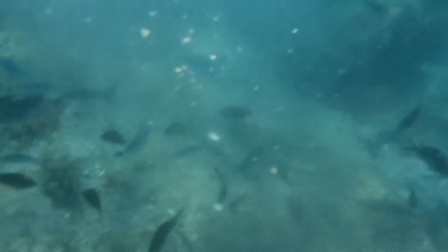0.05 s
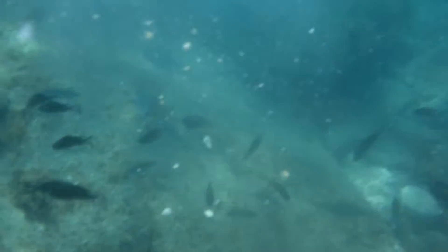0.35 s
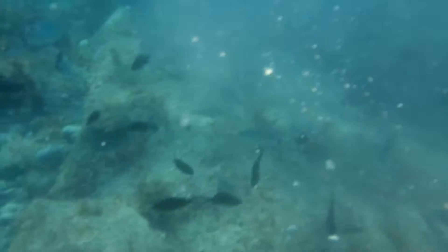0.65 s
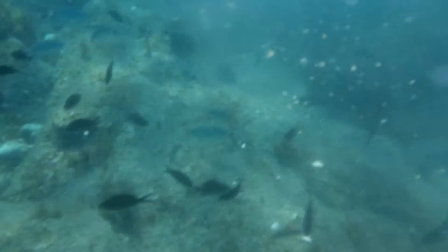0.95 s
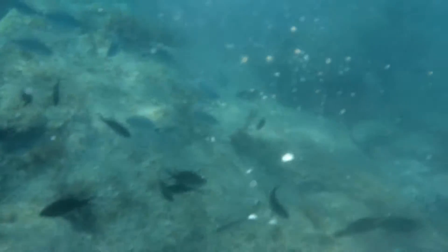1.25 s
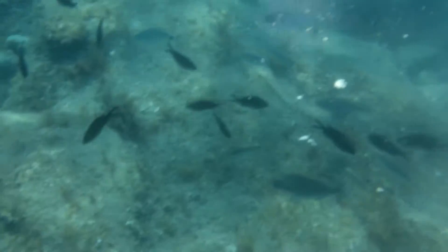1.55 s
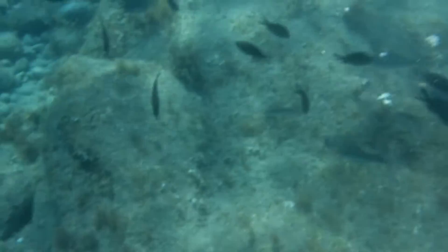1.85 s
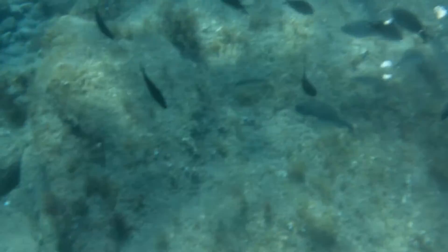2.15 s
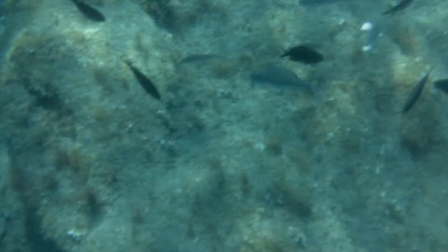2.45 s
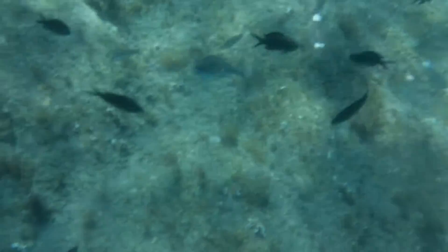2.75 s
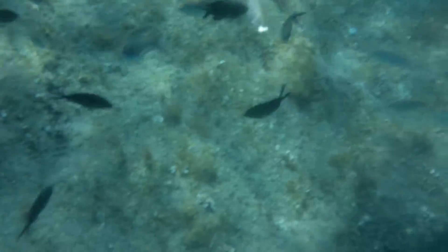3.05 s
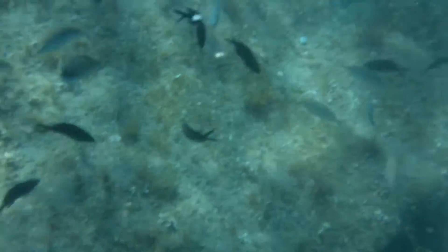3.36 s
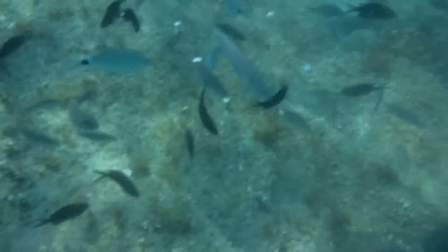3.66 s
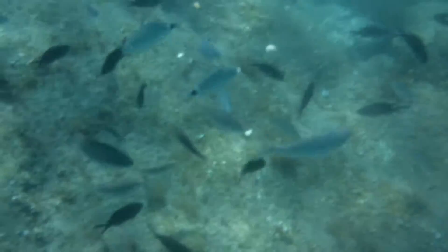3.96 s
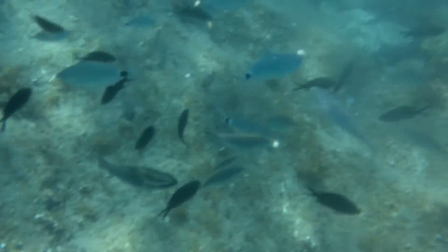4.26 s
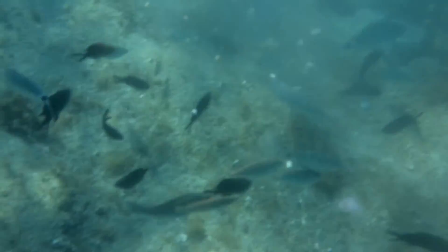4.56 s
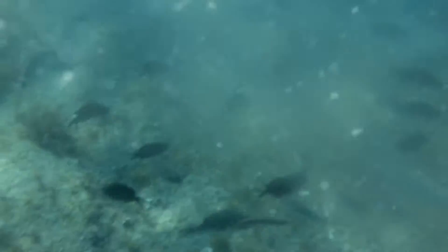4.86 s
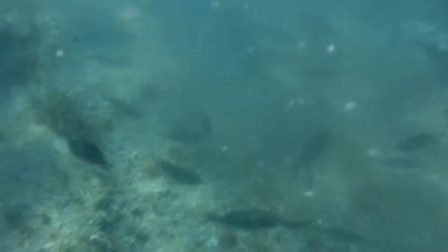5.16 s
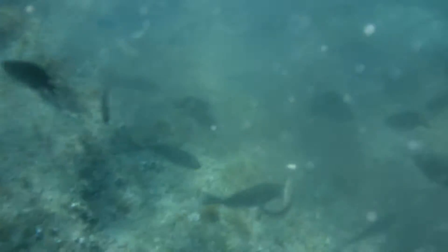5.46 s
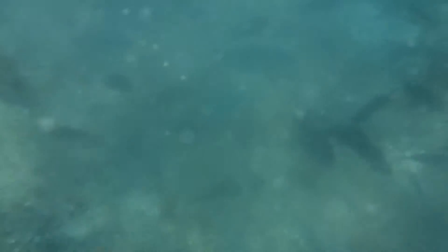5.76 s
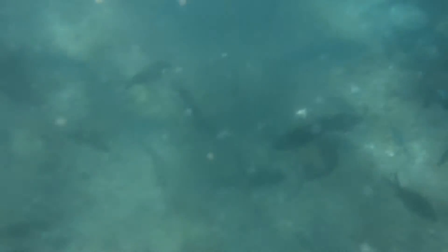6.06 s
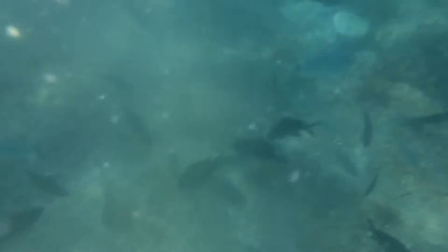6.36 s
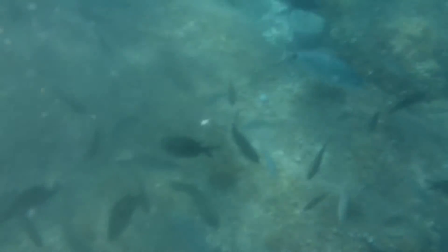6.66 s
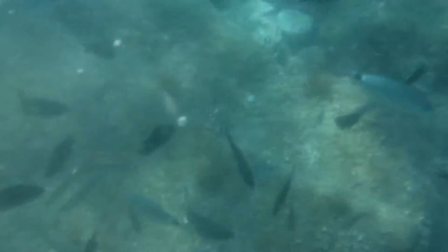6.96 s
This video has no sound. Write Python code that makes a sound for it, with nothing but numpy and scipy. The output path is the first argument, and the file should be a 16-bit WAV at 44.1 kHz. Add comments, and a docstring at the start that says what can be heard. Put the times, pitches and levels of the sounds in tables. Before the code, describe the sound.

Heard from inside a watertight case above a rocky seabed, eddies thud and rumble unevenly against the microphone. An early low burble of air gives way to scattered plinks, a rounder bloop about halfway and light fizzing swells of tiny bubbles. The case clicks now and then, with a sharp crack and a duller knock late on. The water sounds muffled, over a faint hiss.

```python
"""Low thumps and churning: eddies hit a watertight camera case adrift just below the surface.
Over a rocky seabed, bubbles ring as they close, swarms of tiny ones gurgle, one air cloud boils up.
Sharp ticks and knocks ring the case resonances over a faint steady hiss.
The water muffles everything."""
import sys
import numpy as np
from scipy import signal
from scipy.fft import rfft, irfft
from scipy.io import wavfile
from scipy.ndimage import uniform_filter1d

SR = 44100
rng = np.random.default_rng(int(sys.argv[2]) if len(sys.argv) > 2 else 0)


def dump_mix(stems):
    """Bounce the given channels to the path in sys.argv[1] as a 16-bit WAV at rate SR."""
    frames = np.atleast_2d(stems).T  # one column per channel
    limited = np.clip(frames, -1, 1)  # hard clip at full scale
    pcm = np.round(limited * 32767).astype(np.int16)
    wavfile.write(sys.argv[1], SR, pcm)


N = 318402

# strong eddies: crest t/s, level/dB, f/Hz, half length/s
STRONG_EDDIES = [(.022, -23, 136, 0.018), (0.074, -15, 120.4, .006), (.123, -8.5, 103.7, .004),
                 (0.198, -3, 88.5, .0034), (0.208, -13, 72, 0.033), (.286, -20, 97.7, .004),
                 (0.423, -14.5, 164.7, 0.0043), (0.609, -18.5, 105, 0.0014), (0.784, -11.5, 95, 0.0055),
                 (.848, -17, 98.4, 0.012), (0.95, -10.5, 90.5, 0.0047), (.975, -13.5, 118, .002),
                 (1.182, -15.5, 94, .0055), (1.298, -12.5, 125.6, .005), (1.332, -15, 122, .004),
                 (1.478, -21, 149, 0.0066), (1.584, -11, 122.6, .0015), (1.685, -22.5, 139, 0.017),
                 (1.773, -15.5, 111.5, .005), (1.811, -19, 102.4, .0045), (1.964, -12.5, 105.8, 0.01),
                 (2.019, -13, 95, .003), (2.124, -10, 126.5, 0.0055), (2.19, -20.5, 113.5, 0.037),
                 (2.226, -18.5, 118.4, 0.0015), (2.3, -18.5, 149, .008), (2.549, -20.5, 177, 0.0015),
                 (2.579, -17, 125.5, 0.0092), (2.798, -14, 81, 0.003), (2.826, -12, 100.7, .0056),
                 (3.001, -17, 89.4, 0.0027), (3.029, -23, 102.5, .018), (3.063, -18, 92.2, 0.0028),
                 (3.172, -22.5, 101.7, 0.0097), (3.284, -13.5, 139, .005), (3.343, -14.5, 139.4, .011),
                 (3.392, -18, 112.3, 0.0072), (3.42, -13, 114, 0.011), (3.449, -22.5, 132, 0.0049),
                 (3.532, -11.5, 111, 0.0016), (3.553, -10, 126.2, .008), (3.691, -7, 119.3, 0.0034),
                 (3.716, -18, 119, .009), (3.79, -16.5, 123, 0.0027), (3.946, -15.5, 141.5, 0.005),
                 (3.971, -24, 131, 0.014), (4.202, -14, 140, .005), (4.341, -22, 106, 0.012),
                 (4.4, -12, 127.4, 0.0044), (4.466, -24.5, 111, 0.0058), (4.61, -21, 105, 0.0053),
                 (4.633, -19, 98, 0.014), (5.016, -25.5, 121, 0.018), (5.302, -12.5, 95.4, 0.0047),
                 (5.379, -16, 114.6, 0.0045), (5.516, -24.5, 116.6, .004), (5.581, -19.5, 96, .0017),
                 (6.021, -19, 82, 0.0034), (6.167, -22.5, 106.5, 0.0089), (6.362, -25, 107.5, 0.0075),
                 (6.408, -22, 143, 0.0065), (6.427, -20, 106.4, 0.0044), (6.5, -16, 139, 0.011),
                 (6.611, -11, 142.6, 0.0037), (6.817, -16.5, 118, 0.014), (6.923, -13, 93, 0.0039)]
# flow past the case: t/s, level/dB
FLOW_LEVEL = [(0, -34), (.5, -40), (.8, -34), (1.05, -41.5), (1.38, -33.5), (2.05, -35.5), (2.65, -43.5),
              (3.15, -43), (3.4, -38), (4.1, -43), (4.43, -36.5), (4.74, -49.5), (5.45, -40), (6.4, -43.5),
              (6.73, -48.5), (7.22, -46)]
# rumble of small eddies: f/Hz, level/dB
CHURN_SPECTRUM = [(15, -22.5), (28, -8), (48, 12), (75, 5), (120, 9.5), (165, 1.5), (215, -12.5),
                  (280, -25.5), (400, -33.5), (700, -68)]
# fast water on the case: f/Hz, level/dB
SLOSH_SPECTRUM = [(120, -10.5), (260, 12), (380, 2.5), (550, -4.5), (1000, -17.5), (2000, -24.5),
                  (6000, -60)]
# clear single bubbles: t/s, f/Hz, level/dB, t60/s
SINGLE_BUBBLES = [(.008, 924, -34.5, 0.045), (.227, 1170, -34, 0.032), (.549, 1070, -45, 0.092),
                  (.732, 851, -38.5, 0.13), (.734, 1586, -38, 0.049), (.753, 1057, -39.5, 0.049),
                  (.884, 976, -39, 0.055), (.944, 844, -34.5, 0.043), (1.803, 790, -39, 0.065),
                  (2.018, 307, -25, 0.046), (2.032, 1110, -37, 0.025), (2.149, 1810, -49, 0.064),
                  (2.186, 1470, -45, .04), (2.218, 1636, -47, 0.042), (2.224, 1284, -34, .032),
                  (2.776, 407, -39, 0.074), (3.012, 894, -43, 0.052), (3.076, 945, -39, 0.031),
                  (3.078, 388, -30.5, 0.032), (3.086, 595, -41.5, 0.15), (3.125, 1600, -51, 0.1),
                  (3.28, 267, -27.5, 0.057), (3.392, 2220, -41.5, 0.054), (3.4, 1690, -44, 0.089),
                  (3.415, 1286, -33.5, 0.057), (3.4355, 1122, -29.5, 0.069), (3.437, 1322, -36, .11),
                  (3.545, 575, -31.5, 0.058), (3.549, 1288, -32.5, 0.093), (3.689, 329.7, -18, .13),
                  (4.201, 236, -24, 0.025), (4.33, 980, -41.5, 0.053), (4.353, 1860, -44.5, 0.039),
                  (4.394, 970, -20.5, 0.0077), (4.412, 1620, -35, .042), (4.417, 1362, -30.5, 0.049),
                  (4.98, 1180, -36.5, 0.017), (5.261, 1620, -39.5, 0.034), (5.299, 935, -37.5, 0.053),
                  (5.595, 970, -21, 0.0069), (5.771, 236, -19, 0.041), (5.795, 1500, -46, 0.047),
                  (6.233, 1193, -53, 0.13)]
# two large bubbles pinching off, one track each: t/s, f/Hz, level/dB
WARBLE_TRACKS = [
    [(1.579, 740, -95), (1.582, 680, -28), (1.592, 788, -28.5), (1.603, 930, -30), (1.611, 730, -34),
     (1.622, 1035, -38.5), (1.626, 813, -32), (1.65, 824, -47.5), (1.71, 814, -77)],
    [(2.546, 845, -65), (2.551, 857, -35), (2.572, 1063, -43.5), (2.586, 1460, -55), (2.6, 2100, -74)],
]
# trickle of air: t/s, level/dB
TRICKLE_LEVEL = [(0, -62.5), (1.5, -64), (2.4, -68.5), (4.2, -74.5), (4.9, -68), (5.7, -63.5), (6.1, -70.5),
                 (7.22, -74.5)]
# puffs of air stirred into the water: crest t/s, level/dB, decay constant/s
AIR_PUFFS = [(.01, -54.5, 0.23), (.24, -55.5, 0.033), (.56, -52.5, .17), (1.24, -58, 0.3),
             (2.03, -54, 0.13), (2.8, -58.5, 0.077), (3.05, -53, 0.24), (3.43, -52, 0.34), (3.77, -54, .05),
             (4.42, -51.5, 0.21), (5.23, -65, 0.21), (5.59, -64, 0.24)]
# bubbles too small to tell apart: f/Hz, level/dB
WASH_SPECTRUM = [(250, 2.5), (550, -9.5), (850, -1), (1150, 1), (1500, -6.5), (1900, -11.5), (2400, -24),
                 (3200, -16.5), (4500, -23.5), (9000, -31.5)]
# air cloud boiling up: t/s, level/dB
CLOUD_LEVEL = [(.62, -60), (.69, -34.5), (.76, -31.5), (.84, -31.5), (.93, -36), (1.02, -40.5), (1.12, -51),
               (1.2, -81)]
# collective cloud modes: f/Hz, width per filter stage/Hz, level/dB
CLOUD_RESONANCES = [(223, 39, 7.5), (320, 39, 9), (389.6, 32.5, 10.5), (880, 82, -19.5), (1140, 86, -13.5)]
# hits on the case: t/s, ring level/dB, ring low f/Hz, ring high f/Hz, snap level/dB, snap high f/Hz
CASE_HITS = [(0.023, -47, 1800, 3860, -57, 12000), (.047, -42, 1320, 2650, -60, 7000),
             (0.064, -50.5, 1200, 3500, -59, 7000), (.199, -28, 297, 950, -57.5, 14000),
             (0.286, -52.5, 1000, 5000, -54, 6200), (0.303, -61, 4000, 7000, -57, 12000),
             (.809, -30.5, 1230, 3200, -34.5, 7700), (0.844, -39.5, 1100, 3880, -55, 5600),
             (.956, -41.5, 2700, 3370, -51.5, 13000), (1.81, -36, 2710, 3150, -48.5, 14000),
             (2.11, -52.5, 2600, 4000, -64, 12000), (2.1707, -44.5, 3010, 3400, -56, 14000),
             (2.196, -55.5, 5500, 7050, -64, 7200), (2.251, -53, 1000, 4000, -57, 14000),
             (2.566, -48, 2500, 3700, -58, 12000), (2.726, -44, 1780, 3940, -53.5, 12000),
             (2.817, -41.5, 710, 1610, -77, 7000), (2.986, -45.5, 900, 3520, -64, 7000),
             (3.3917, -47.5, 1400, 3600, -63.5, 7000), (3.547, -41, 287, 924, -76, 7000),
             (3.7838, -35, 740, 1450, -75, 7000), (4.281, -37.5, 584, 2280, -52, 7000),
             (4.426, -60, 2500, 5000, -53.5, 7000), (4.731, -36, 940, 2150, -53, 12000),
             (4.966, -49, 1480, 4030, -58, 7000), (5.554, -42, 940, 3500, -55, 8000),
             (5.7072, -21, 920, 3350, -33.5, 10600), (6.125, -51, 2000, 5000, -55, 9000),
             (6.279, -47.5, 295, 1320, -63, 7000), (6.6062, -24, 200, 880, -47.5, 6200),
             (6.721, -39, 910, 4160, -42, 7000)]
# case resonances: f/Hz, width/Hz, level/dB
CASE_MODES = [(405, 180, 1.5), (715, 1500, 3), (1045, 80, 11.5), (1720, 1300, -3.5), (2100, 750, -16.5),
              (2936, 390, 6), (4340, 450, 3.5), (4630, 1200, -16), (7000, 180, 4.5), (12900, 5100, -3)]
# hiss colour: f/Hz, level/dB
HISS_SPECTRUM = [(300, 0), (600, -14), (1100, 3), (1600, -20.5), (2200, -5.5), (3000, -2), (3600, -12),
                 (4400, -8), (5600, -14.5), (7100, -7.5), (8500, -19.5), (15000, -17)]
# hiss, with an early dip: t/s, level/dB
HISS_ENVELOPE = [(0, -69), (.3, -72.5), (.5, -71), (.7, -67.5), (2.3, -69), (4.3, -67.5), (7.22, -67.5)]


def eddy(db, hz, half_s, rise=1.83, fall=1.376, sag=.21):
    """Pressure pulse cresting mid-buffer: swells, fades, sags in pitch as the eddy spreads."""
    t = np.arange(-SR // 10, SR // 10) / SR
    age = np.clip(t / half_s, -50, 50)
    swell = 2 / (np.exp(-rise * age) + np.exp(fall * age))
    turns = np.cumsum(hz * (1 - sag * np.tanh(age))) / SR
    return -undb(db) * swell * np.sin(2 * np.pi * (turns - turns[len(t) // 2]))


def thumps():
    """Strong eddies hit the case one by one."""
    out = np.zeros(N)
    for crest_s, db, hz, half_s in STRONG_EDDIES:
        wave = eddy(db, hz, half_s)
        add(out, crest_s - len(wave) / SR / 2, wave)
    return out


def weak_eddies(count=56, over_flow_db=13, spread_db=3, centre_hz=122, spread_oct=.25, half_s=.0034):
    """Loose procession of eddies, scaled by the flow that sheds them."""
    out = np.zeros(N)
    for k, (lag, strength, pitch, length) in enumerate(rng.uniform(-1, 1, (count, 4))):
        hz = centre_hz * 2 ** (spread_oct * pitch)
        wave = eddy(over_flow_db + spread_db * strength, hz, half_s * np.exp(length))
        crest_s = (k + .5 + lag / 2) * N / SR / count
        add(out, crest_s - len(wave) / SR / 2, wave)
    return out * curve(FLOW_LEVEL)


def churn(over_flow_db=7):
    """Many small eddies overlap into a lumpy rumble."""
    rumble = colour(impulses(per_s=240, spread_db=1.5), CHURN_SPECTRUM)
    return unit(rumble) * curve(FLOW_LEVEL) * undb(over_flow_db)


def slosh(pressure, gain_db=-30, exponent=1.51):
    """Water rushing over the case rustles with each pressure swing."""
    rustle = unit(colour(impulses(per_s=3000, spread_db=3.5), SLOSH_SPECTRUM))
    envelope = np.abs(signal.hilbert(pressure))
    peak = envelope.max()
    return rustle * peak * (envelope / peak) ** exponent * undb(gain_db)


def bubble(hz, t60_s, glide_oct_per_s, onset_cycles=.8, wobble_oct=.022):
    """A bubble rings on closing; pitch glides and wobbles as its shape changes."""
    t = np.arange(int(t60_s * SR) + 2) / SR
    shape = np.interp(t, np.linspace(0, .2, 40), rng.standard_normal(40))
    turns = np.cumsum(hz * 2 ** (glide_oct_per_s * t + wobble_oct * shape)) / SR
    onset = 1 - np.exp(-(turns / onset_cycles) ** 2)
    return np.sin(2 * np.pi * turns) * undb(-60 * t / t60_s) * onset


def clear_bubbles(shed_db=-14, shed_oct=.11, shed_s=.031):
    """Plinks and bloops; each bubble sheds four short-lived ones of similar size."""
    out = np.zeros(N)
    for start_s, hz, db, t60_s in SINGLE_BUBBLES:
        add(out, start_s, undb(db) * bubble(hz, t60_s, glide_oct_per_s=2))
        for lag, pitch in rng.random((4, 2)):
            shed_hz = hz * 2 ** (shed_oct * (2 * pitch - 1))
            add(out, start_s + shed_s * lag, undb(db + shed_db) * bubble(shed_hz, t60_s / 2, 0))
    return out


def warbles():
    """Large bubbles swing in pitch, squeezed as they pinch off."""
    out = np.zeros(N)
    for track in WARBLE_TRACKS:
        times_s, hz, db = np.transpose(track)
        t = np.arange(times_s[0], times_s[-1], 1 / SR)
        turns = np.cumsum(np.interp(t, times_s, hz)) / SR
        add(out, times_s[0], undb(np.interp(t, times_s, db)) * np.sin(2 * np.pi * turns))
    return out


def cloud():
    """Air breaking up drives the low, steep-sided modes of a bubble cloud."""
    bursts = impulses(per_s=900, spread_db=2.5)
    ring = sum(undb(db) * resonate(resonate(bursts, hz, width_hz), hz, width_hz)
               for hz, width_hz, db in CLOUD_RESONANCES)
    t = np.arange(N) / SR
    active = (t > CLOUD_LEVEL[0][0]) & (t < CLOUD_LEVEL[-1][0])
    return unit(ring) * curve(CLOUD_LEVEL) * active


def case_ring(force):
    """Summed response of the case modes."""
    return sum(undb(db) * resonate(force, hz, width_hz) for hz, width_hz, db in CASE_MODES)


def knock(ring_db, lo_hz, hi_hz, snap_db, snap_hi_hz, snap_lo_hz=4400, scatter_s=.0012, tail_s=.0097):
    """A push and its echoes ring the case: one main band, all modes faintly, a crisp snap on top."""
    t = np.arange(SR // 10) / SR
    push = rng.standard_normal(len(t)) * (.18 * np.exp(-t / scatter_s) + .028 * np.exp(-t / tail_s))
    push[0] += 1
    modes = case_ring(push)
    ring = unit_hit(band(modes, lo_hz, hi_hz)) + undb(-21) * unit_hit(modes)
    snap = unit_hit(band(modes, snap_lo_hz, snap_hi_hz))
    return undb(ring_db) * ring + undb(snap_db) * snap


def ticks(faint_count=12, faint_db=-53, spread_db=3, centre_hz=1000, spread_oct=2.6):
    """Sharp hits on the case, plus faint random ones ringing a two-octave band each."""
    out = np.zeros(N)
    for start_s, *hit in CASE_HITS:
        add(out, start_s, knock(*hit))
    for when, strength, pitch in rng.random((faint_count, 3)):
        hz = centre_hz * 2 ** (spread_oct * (2 * pitch - 1))
        db = faint_db + spread_db * (2 * strength - 1)
        add(out, when * N / SR, knock(db, hz / 2, hz * 2, snap_db=-67, snap_hi_hz=8000))
    return out


def air(attack_s=.068):
    """Air in the water, as a gain: power sum of trickle and puffs."""
    t = np.arange(N) / SR
    puffs = [undb(db) * np.exp(-np.maximum((crest_s - t) / attack_s, (t - crest_s) / decay_s))
             for crest_s, db, decay_s in AIR_PUFFS]
    return np.sqrt(curve(TRICKLE_LEVEL) ** 2 + np.sum(np.square(puffs), axis=0))


def gurgle(count=1100, centre_hz=1250, spread_oct=.5, spread_db=2.5, t60_cycles=32, gain_db=-5.5):
    """Tiny bubbles, the smaller ones higher, shorter and softer, over a swirling wash."""
    swarm = np.zeros(N)
    for when, (pitch, strength, glide) in zip(rng.random(count), rng.standard_normal((count, 3))):
        hz = centre_hz * 2 ** (spread_oct * pitch)
        gain = undb(spread_db * min(strength, 2)) * min(centre_hz / hz, 1)
        add(swarm, when * N / SR, gain * bubble(hz, t60_cycles / hz, glide_oct_per_s=3 * glide))
    swirl = np.sqrt(uniform_filter1d(np.abs(swarm), SR // 50) + 1e-9)  # 20 ms swarm envelope
    wash = colour(rng.standard_normal(N), WASH_SPECTRUM) * swirl
    return undb(gain_db) * (unit(swarm) + unit(wash)) * air()


def stray_bubbles(count=14, from_s=4.45, to_s=5.3, centre_hz=1500, spread_oct=.29, gain_db=-24):
    """Faint plinks trail the last big puff, louder with more air."""
    out = np.zeros(N)
    for k, (lag, pitch, glide) in enumerate(rng.standard_normal((count, 3))):
        hz = centre_hz * 2 ** (spread_oct * pitch)
        ring = bubble(hz, t60_s=.075, glide_oct_per_s=3 * glide, wobble_oct=.046)
        add(out, from_s + (k + .5 + lag / 2) / count * (to_s - from_s), ring)
    return out * air() ** .44 * undb(gain_db)


def hiss(crackle_db=-80):
    """Smooth hiss, plus far-off snaps crackling through the case."""
    snaps = impulses(per_s=60, spread_db=5)
    crackle = band(case_ring(snaps), 2900, 4800)
    smooth = colour(rng.standard_normal(N), HISS_SPECTRUM)
    return curve(HISS_ENVELOPE) * unit(smooth) + undb(crackle_db) * unit(crackle)


def undb(db):
    """dB to gain."""
    return 10 ** (np.asarray(db) / 20)


def unit(x):
    """Scale to rms 1."""
    return x / np.sqrt(np.mean(x ** 2))


def unit_hit(x):
    """Scale to the energy of 1 ms at rms 1."""
    return x / np.sqrt(np.sum(x ** 2) / (SR / 1000))


def curve(rows):
    """Per-sample gain from rows of t/s, level/dB."""
    times_s, db = np.transpose(rows)
    return undb(np.interp(np.arange(N) / SR, times_s, db))


def add(out, start_s, x):
    """Mix x into out at start_s."""
    i = int(start_s * SR)
    lo, hi = max(i, 0), min(i + len(x), len(out))
    if hi > lo:
        out[lo:hi] += x[lo - i:hi - i]


def colour(x, spectrum):
    """Filter by rows of f/Hz, level/dB."""
    hz, db = np.transpose(spectrum)
    bins_hz = np.maximum(np.fft.rfftfreq(len(x), 1 / SR), 1)
    return irfft(rfft(x) * undb(np.interp(np.log(bins_hz), np.log(hz), db)), len(x))


def resonate(x, hz, width_hz):
    """One resonance, unity gain at centre."""
    return signal.lfilter(*signal.iirpeak(hz, hz / width_hz, fs=SR), x)


def band(x, lo_hz, hi_hz):
    """Butterworth band-pass."""
    return signal.sosfilt(signal.butter(2, [lo_hz, hi_hz], "band", fs=SR, output="sos"), x)


def impulses(per_s, spread_db):
    """Pushes of random time, sign and size."""
    pushes = (rng.random(N) < per_s / SR) * rng.choice([-1, 1], N)
    return pushes * undb(spread_db * np.clip(rng.standard_normal(N), -2, 2))


def scene():
    """All sources reach one microphone through the case."""
    pressure = thumps() + weak_eddies() + churn()
    water = pressure + slosh(pressure)
    bubbles = clear_bubbles() + stray_bubbles() + warbles() + gurgle() + cloud()
    return (water + bubbles + ticks() + hiss())[None]


def record(dry, low_cut_hz=24, high_cut_hz=15300):
    """The microphone loses the deepest swings; the recorder cuts the top."""
    dry = signal.sosfilt(signal.butter(1, low_cut_hz, "high", fs=SR, output="sos"), dry)
    return signal.sosfilt(signal.ellip(10, .2, 70, high_cut_hz, fs=SR, output="sos"), dry)


dry = scene()
out = record(dry)
dump_mix(out)
```